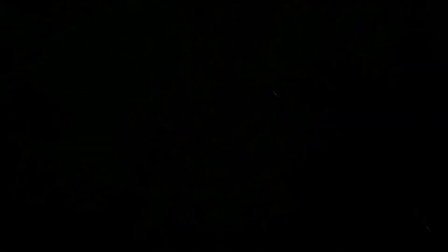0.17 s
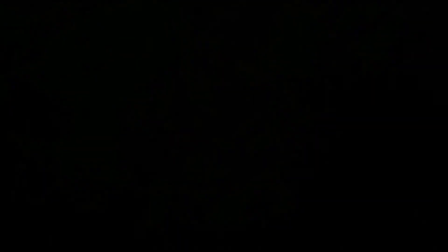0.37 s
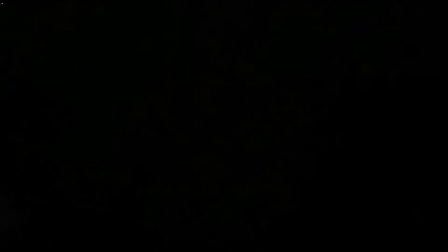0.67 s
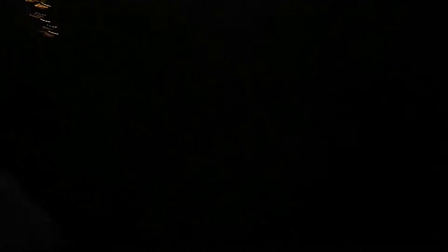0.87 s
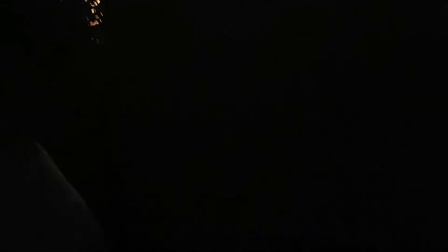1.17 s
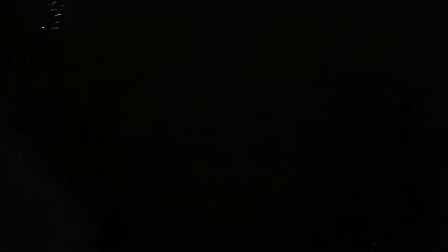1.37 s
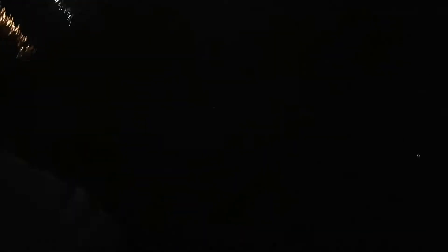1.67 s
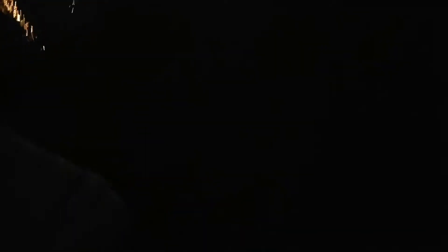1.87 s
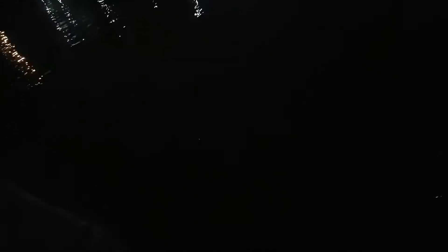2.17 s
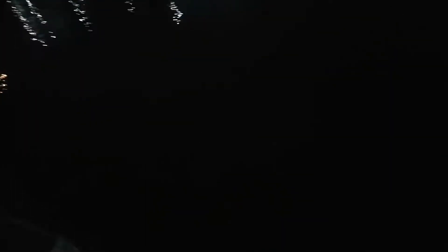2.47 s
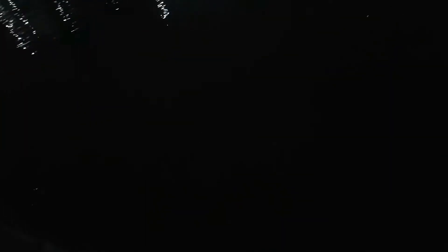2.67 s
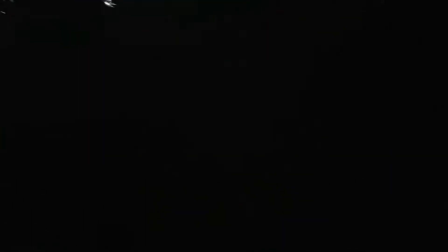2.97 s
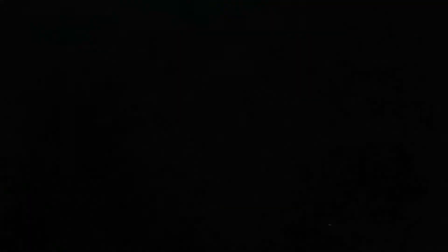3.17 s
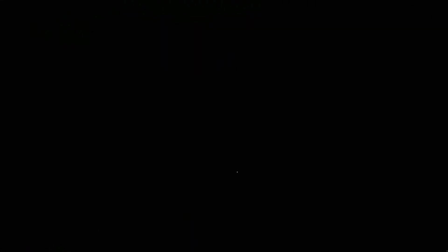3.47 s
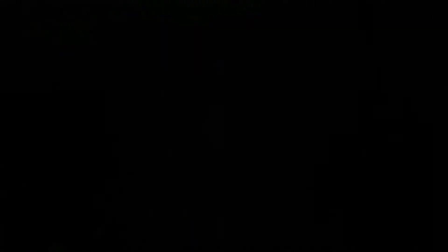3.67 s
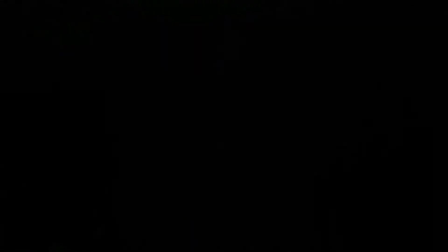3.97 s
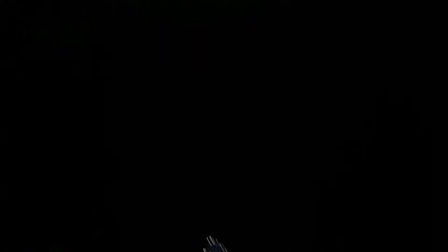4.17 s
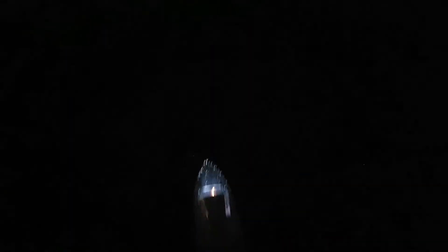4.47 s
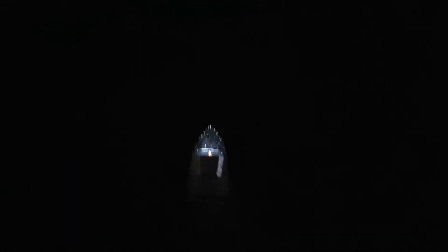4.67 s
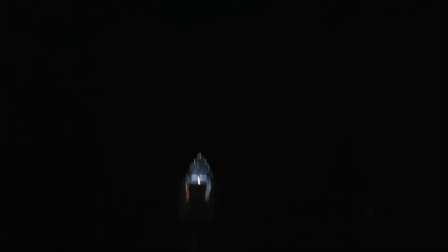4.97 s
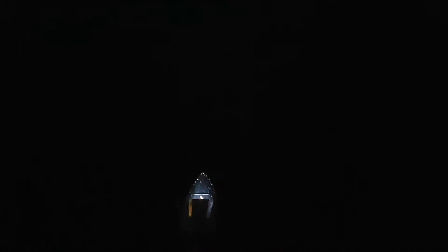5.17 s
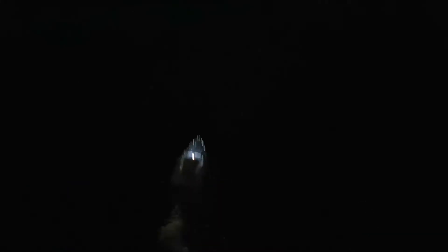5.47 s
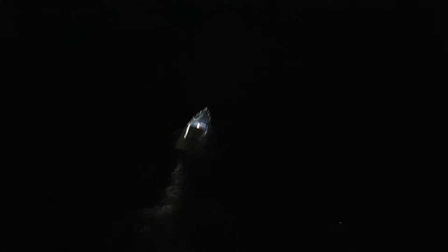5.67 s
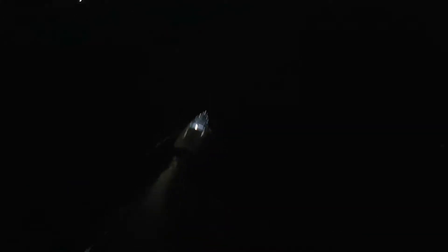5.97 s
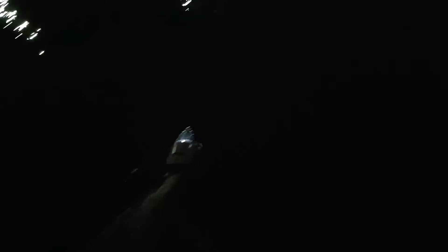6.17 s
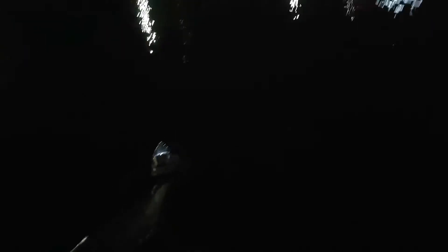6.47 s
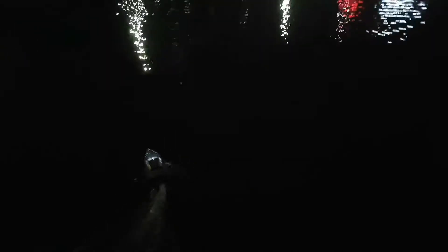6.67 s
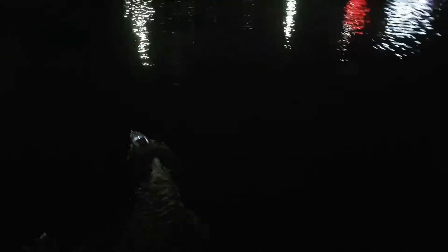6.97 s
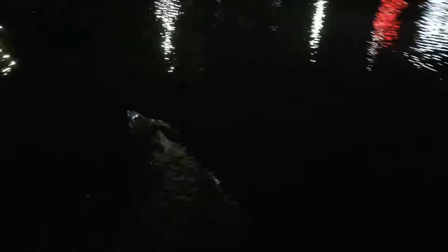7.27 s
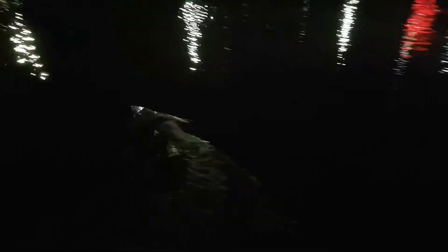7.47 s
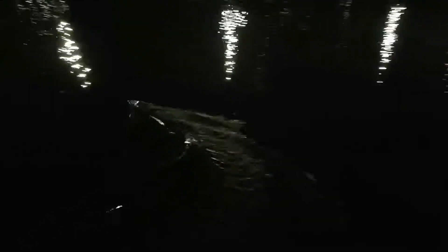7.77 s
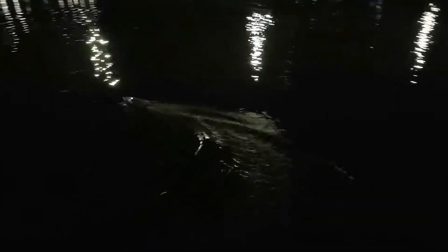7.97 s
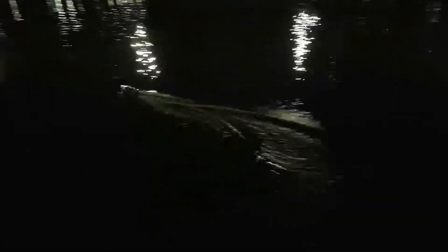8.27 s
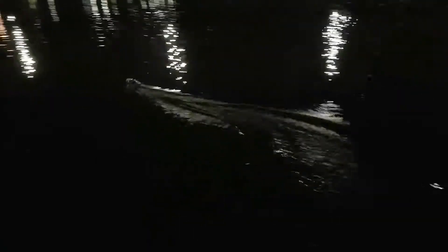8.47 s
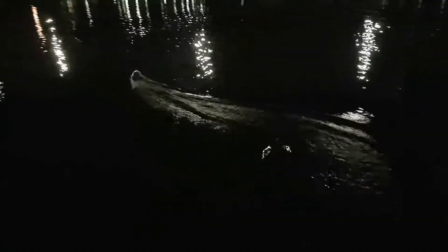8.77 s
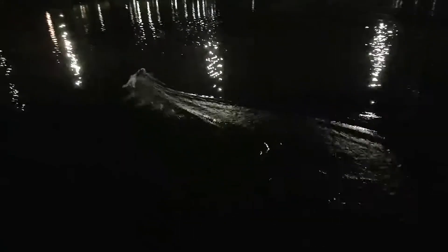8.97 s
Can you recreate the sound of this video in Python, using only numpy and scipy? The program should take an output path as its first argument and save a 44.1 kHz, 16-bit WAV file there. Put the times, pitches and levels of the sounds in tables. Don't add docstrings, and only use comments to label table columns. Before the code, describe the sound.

A handheld stereo microphone at a dark riverbank catches sleeve rustle, taps and clicks over a soft traffic wash. After a nearly quiet pause, a small electric boat starts very close: a quick upward swoop, a steady buzzing whine with rough undertones, a drop in pitch, then stepwise rises. Hissing propeller wash surrounds it; later the tone wavers, flutters and weakens with distance.

```python
import sys
import numpy as np
from scipy import signal
from scipy.fft import rfft, irfft, next_fast_len
from scipy.io import wavfile
from scipy.ndimage import uniform_filter1d, map_coordinates

SR = 44100
rng = np.random.default_rng(int(sys.argv[2]) if len(sys.argv) > 2 else 0)


def master_out(mix):
    frames = np.transpose(np.atleast_2d(mix))
    ceiling = np.clip(frames, -1, 1)
    pcm = np.round(ceiling * 32767).astype(np.int16)
    wavfile.write(sys.argv[1], SR, pcm)


def gain_from_db(level_db):
    decades = np.asarray(level_db, float) / 20
    return 10 ** decades


N = 401751

# time [s], level of all shaft orders with distance [dB], flutter depth [0-1].
COURSE = [(3.2, -35, 0.7), (3.27, -14, 0.16), (3.35, 3, 0.05), (3.8, -2.5, 0.11), (4.2, -3, 0.06),
          (4.7, -5.5, 0.07), (4.95, -5, 0.12), (5.4, -4, 0.05), (5.8, -0.5, 0.16), (6.2, -3, 0.09),
          (6.7, -7, 0.31), (7.2, -7, 0.21), (7.7, 0.5, 0.12), (8.2, -6, 0.18), (8.7, -8, 0.28),
          (9.11, -9, 0.18)]


def rms_one(x):
    return x / np.sqrt(np.mean(x ** 2) + 1e-20)


def in_time(rows):
    s, *columns = np.transpose(rows)
    return [np.interp(np.arange(N) / SR, s, c) for c in columns]


def at_hz(points, hz):
    table_hz, value = np.transpose(points)
    return np.interp(np.log(hz), np.log(table_hz), value)


def bump(s, half_width, order=2):
    out, t = np.zeros(N), np.arange(N) / SR
    first = max(int((s - 3 * half_width) * SR), 0)
    near = slice(first, int((s + 3 * half_width) * SR))
    out[near] = np.exp(-((t[near] - s) / half_width) ** order)
    return out


def drift(rate):
    thin = 20
    pole = np.exp(-2 * np.pi * rate * thin / SR)
    noise = rng.standard_normal(N // thin + 4002)
    slow = signal.lfilter([1], [1, -2 * pole, pole * pole], noise)[4000:]
    return np.interp(np.arange(N) / thin, np.arange(len(slow)), rms_one(slow))


def panned(db):
    return gain_from_db(np.array([db / 2, -db / 2]))


def bands(spectrum, patchy_db, speed):
    shared_flicker = .45
    edges = 20 * 2 ** np.arange(0, 9.6, .5)
    centres = np.sqrt(edges[:-1] * edges[1:])
    inside = (centres > spectrum[0][0]) * (centres < spectrum[-1][0])
    gains = gain_from_db(at_hz(spectrum, centres)) * inside
    gains = gains / np.sqrt(np.sum(gains ** 2 * np.diff(edges)) * 2 / SR)
    white, together = rng.standard_normal((2, 3, N)), drift(speed / 3)
    for k in np.flatnonzero(gains):
        sos = signal.butter(2, edges[k:k + 2], "band", fs=SR, output="sos")
        flicker_db = patchy_db * (shared_flicker * together + drift(speed))
        yield centres[k], gains[k] * gain_from_db(flicker_db), sos, white[k % 2]


def diffuse(spectrum, patchy_db, speed):
    # frequency [Hz], left-right likeness [share].
    likeness = [(60, 0.92), (180, 0.94), (550, 0.52), (1640, -1.7), (4950, -0.11), (14900, -0.31)]
    out = 0
    for hz, gain, sos, white in bands(spectrum, patchy_db, speed):
        mid, side = signal.sosfilt(sos, white[:2])
        alike = np.clip(at_hz(likeness, hz), 0, 1)
        middle = np.sqrt((1 + alike) / 2) * mid
        spread = np.sqrt((1 - alike) / 2) * side * [[1], [-1]]
        out = out + gain * (middle + spread)
    return out


def noise_band(hz, db, half_width_hz):
    lowpass = signal.butter(2, half_width_hz, fs=SR, output="sos")
    wide = signal.sosfilt(lowpass, rng.standard_normal((2, N)))
    return gain_from_db(db) * rms_one(wide * np.cos(2 * np.pi * np.cumsum(hz) / SR))


def passing_car():
    # time [s], low band [Hz], its level [dB], high band [Hz], its level [dB].
    car_bands = [
        (0, 901, -39.5, 1505, -64),
        (.5, 866, -45.5, 1432, -59),
        (1.0, 847, -47, 1491, -47.5),
        (1.35, 898, -51.5, 1580, -46.5),
        (1.8, 880, -67, 1640, -55),
    ]
    low_hz, low_db, high_hz, high_db = in_time(car_bands)
    low = noise_band(low_hz, low_db, half_width_hz=108)
    return low + noise_band(high_hz, high_db, half_width_hz=260)


def night():
    # time [s], wind rumble [dB], traffic, later with the boat's low noise [dB].
    night_levels = [(0, -41, -41.5), (.63, -41.5, -44), (1.62, -48, -43), (1.75, -58.5, -42),
                    (3.2, -57, -43), (3.98, -53, -53), (4.2, -56, -39.5), (4.85, -44, -40),
                    (5.63, -43.5, -33.5), (6.04, -46, -36), (6.6, -44, -37), (9.11, -46.5, -41)]
    # frequency [Hz], density [dB per Hz].
    rumble_colour = [(12, -39), (20, -13), (59, 1), (103, 0), (167, -11), (200, -2), (260, -44),
                     (440, -120)]
    # frequency [Hz], density [dB per Hz].
    traffic_colour = [(59, -31), (100, -12), (179, -5), (439, 0.5), (625, -1.5), (1530, -4.5),
                      (3380, -27.5), (8090, -38.5), (9760, -37), (12300, -42.5), (14500, -44)]
    rumble_db, traffic_db = in_time(night_levels)
    wind = gain_from_db(rumble_db) * diffuse(rumble_colour, 0.54, 7.8)
    traffic = gain_from_db(traffic_db) * diffuse(traffic_colour, 1.0, 5.5)
    return wind + traffic + passing_car()


def rustle():
    # time [s], half width [s], level [dB], left-right [dB].
    rub_moves = [(0.11, 0.033, -47.5, 6), (0.27, 0.14, -55.5, -1), (0.42, .05, -64, 3),
                 (0.61, 0.082, -64, 3), (.77, .03, -60, 5), (.89, 0.069, -58, -3.5), (1.03, .04, -56.5, -5),
                 (1.13, 0.047, -57, -6), (1.22, 0.033, -62, 5), (1.335, 0.013, -44.5, 5),
                 (1.42, 0.067, -57.5, -3), (1.68, 0.06, -56.5, -7), (2.629, .04, -63, -2),
                 (2.96, 0.11, -59.5, -10)]
    # frequency [Hz], density [dB per Hz].
    cloth_colour = [(1180, -33), (2000, 6), (2950, -3), (3660, -10), (4940, -5), (5590, -12), (8250, -10.5),
                    (14500, -21)]
    # time [s], half width [s], centre [Hz],
    # level [dB].
    scuffs = [
        (.3, 0.37, 2750, -57),
        (1.12, .1, 2770, -56),
        (1.15, .04, 5000, -62),
        (1.69, .05, 4970, -65),
        (2.635, 0.018, 3800, -60),
        (2.96, .07, 4820, -58),
        (4.15, 0.046, 3500, -37),
    ]
    rest_db = -64
    rubs = sum(gain_from_db(db) * panned(pan_db)[:, None] * bump(s, width) for s, width, db, pan_db in rub_moves)
    ending = np.clip((3.2 - np.arange(N) / SR) / 0.043, 0, 1)
    cloth = ending * (gain_from_db(rest_db) + rubs) * diffuse(cloth_colour, 3.1, 70.0)
    scuff = sum(bump(s, width, order=4) * noise_band(np.full(N, hz), db, half_width_hz=340)
                for s, width, hz, db in scuffs)
    return cloth + scuff


def knocks(rows, t60, puff_share):
    out, t = np.zeros((2, N)), np.arange(4000) / SR
    decay = gain_from_db(-60 * t / t60)
    for s, db, hz, pan_db in rows:
        dull = signal.butter(1, min(0.78 * hz, .45 * SR), fs=SR)
        puff = puff_share * signal.lfilter(*dull, rng.standard_normal(len(t))) * decay
        attack = 1 - np.exp(-t * hz * 1.9)
        ring = np.sin(2 * np.pi * hz * t) * decay * attack
        at = round(s * SR)
        out[:, at:at + len(t)] += gain_from_db(db) * panned(pan_db)[:, None] * (ring + puff)
    return out


def contacts():
    # time [s], peak [dB], pitch [Hz], left-right [dB].
    taps = [(0.1, -34, 1420, -4), (0.166, -31, 1550, -4), (0.257, -40, 2580, -3.5),
            (1.826, -37.5, 2200, -13), (0.058, -37, 1110, -2), (0.1015, -52, 4800, 3),
            (0.167, -38, 2920, 6), (0.194, -52, 4500, 0.5), (0.254, -53, 4600, -3)]
    clicks = [
        (0.0565, -11, 1100, 2),
        (0.8557, -12, 1000, -1.0),
        (1.116, -21, 1300, -5),
        (1.0545, -25, 900, -1),
        (1.3225, -20, 700, 1.5),
    ]
    ticks = [(0.5067, -45, 8320, -10), (0.7682, -53, 8270, -8), (1.0131, -51, 8340, -11),
             (1.0234, -46, 8370, -9), (1.058, -47, 8150, -6), (1.1154, -50, 7400, -6.5),
             (1.2082, -53, 8270, -5), (1.3324, -41, 8120, 0.5), (1.51, -52, 8350, -9),
             (1.552, -55, 8200, -4.0), (1.9949, -52, 13000, -4.0)]
    thumps = [
        (1.054, -16, 322, -1.0),
        (1.112, -25, 350, -4),
        (1.318, -21, 432, -7),
    ]
    out = knocks(taps, t60=0.028, puff_share=0.98) + knocks(clicks, t60=0.0027, puff_share=0.18)
    out += knocks(ticks, t60=0.013, puff_share=1.0)
    return out + knocks(thumps, t60=0.016, puff_share=0.46)


def shaft_speed():
    # time [s], ramp [s], shaft rate reached [turns per s].
    throttle = [(3.2, 0.085, 180), (3.285, 0.05, 278), (3.335, 0.065, 284), (3.405, 0.04, 235),
                (3.493, 0.025, 270), (3.518, 0.04, 289.5), (4.13, 0.07, 231), (4.25, 0.06, 239.2),
                (4.525, 0.035, 265), (4.705, 0.04, 288), (4.745, 0.13, 293.5), (4.875, 0.035, 310),
                (5.1, 0.155, 322), (5.255, 0.032, 362), (5.287, 0.04, 365.8), (5.5, 0.04, 376.6),
                (6.45, 0.055, 422), (7.14, 0.06, 452), (7.2, 0.1, 495), (7.3, 0.07, 512.2)]
    crank_turns_per_s = 110
    s, ramp, turns = np.transpose(throttle)
    t = np.arange(N) / SR
    steps = np.diff(turns, prepend=crank_turns_per_s)
    return crank_turns_per_s + sum(step * np.clip((t - a) / b, 0, 1) for a, b, step in zip(s, ramp, steps))


def low_order(order, hz):
    # frequency [Hz], level [dB].
    hull_low = [(230, -24.5), (290, -13.5), (420, -21.0), (510, -14), (600, -21.5), (760, -20.5),
                (1050, -29.5), (2000, -35)]
    # time [s], half width [s], order,
    # swell or fade [dB].
    rolls = [(3.38, 0.062, 1, -5), (3.4, 0.13, 3, -13.5), (3.62, 0.26, 2, -12), (3.97, 0.039, 3, 6),
             (3.97, 0.18, 2, -11), (4.08, 0.097, 4, 10), (4.14, 0.13, 1, -3), (4.22, 0.036, 4, -15.5),
             (4.3, 0.17, 2, -16.5), (4.39, 0.38, 3, -2), (4.73, 0.44, 2, -4), (4.94, 0.073, 3, 9),
             (4.95, 0.21, 4, 4), (5.31, 0.12, 3, 12.5), (5.38, 0.065, 1, 8), (5.73, 0.26, 1, -8),
             (5.91, 0.076, 3, -20), (6.089, 0.067, 2, 4), (6.2, 0.16, 3, 7), (6.33, 0.057, 2, -6.5),
             (6.401, 0.8, 4, 4), (6.61, 0.21, 2, 5), (7.09, 0.1, 4, 9.5), (7.299, 0.15, 2, 4.5),
             (7.42, 0.14, 3, 15.5), (7.921, 0.12, 3, 13), (8.1, 0.12, 1, -4.5), (8.39, 0.17, 2, 6),
             (8.24, 0.024, 1, 3), (8.57, 0.27, 3, 11.5), (3.315, 0.0084, 1, 10), (3.55, 0.05, 1, -3),
             (3.27, 0.008, 2, 7.5), (4.11, 0.052, 2, 11), (5.16, 0.051, 2, -4.5), (5.34, 0.043, 2, 5.5),
             (7.0, 0.046, 2, 7), (8.2, 0.059, 2, 5.5), (3.55, 0.016, 3, -3), (4.07, 0.058, 3, 6.5),
             (4.26, 0.024, 3, -10), (3.31, 0.015, 4, 6.5), (5.276, 0.036, 3, -5.5), (7.6, 0.03, 3, 5.5),
             (7.72, 0.038, 3, -11), (3.293, 0.0061, 2, 5.5), (9.03, 0.054, 3, -6), (3.8, 0.029, 4, 6),
             (5.46, 0.032, 4, -22), (8.65, 0.081, 4, -9),
             (3.425, 0.009, 2, -5), (3.65, 0.015, 4, -19), (6.18, 0.014, 2, -13), (7.38, 0.014, 4, -11),
            (7.5, 0.021, 2, -14), (7.515, 0.0079, 3, -7), (7.54, 0.016, 4, -17), (7.64, 0.013, 2, -26),
            (7.67, 0.013, 3, -10), (7.79, 0.0096, 3, -12), (7.82, 0.021, 2, -24), (8.045, 0.023, 1, -6),
            (8.161, 0.024, 1, -9), (8.36, 0.0094, 3, -13), (8.389, 0.015, 1, -3), (3.326, 0.012, 2, -4),
            (6.035, .025, 1, -13), (6.33, 0.13, 1, 3), (6.064, 0.011, 2, 8.5), (6.352, 0.0076, 2, -13),
            (8.075, 0.014, 1, -7), (8.55, 0.023, 1, 5), (7.815, 0.019, 3, 5.5), (8.93, 0.008, 3, 11),
            (8.79, 0.034, 3, 0.5), (7.05, .02, 2, -12)]
    # centre [Hz], half width [Hz], gain [dB].
    spin_up_mode = (404, 69, 21.5)
    cut_db = 32 * np.minimum(np.log2(hz / hull_low[0][0]), 0)
    mode_hz, width_hz, mode_db = spin_up_mode
    mode = mode_db * np.exp(-((hz - mode_hz) / width_hz) ** 2)
    dull_db = -13 * (order > 2)
    spin_db = (mode + dull_db) * bump(3.27, 0.027, order=4)
    waves_db = sum(db * bump(s, width) for s, width, k, db in rolls if round(k) == order)
    return at_hz(hull_low, hz) + cut_db + spin_db + waves_db


def singing(order):
    # time [s], half width [s], order, extra level or cut [dB].
    panel_sings = [(3.2, 0.2, 11, -11), (3.2, 0.41, 12, -5), (3.7, 0.2, 16, 7), (3.42, 0.15, 13, -3),
                   (3.43, 0.16, 6, -7), (3.481, 0.028, 7, -15), (3.65, 0.16, 11, 9), (3.7, 0.13, 8, -16),
                   (3.86, 0.56, 9, 7.5), (4.02, 0.053, 7, 5), (4.38, 0.11, 14, 1), (4.28, 0.085, 9, -12),
                   (4.46, 0.15, 8, -10), (4.51, 0.064, 10, -13), (4.63, 0.11, 13, 18), (5.05, 0.17, 11, -6),
                   (5.22, 0.27, 7, -5), (5.64, 0.79, 10, -18), (5.91, 0.29, 5, -10), (5.95, 0.49, 6, -6.5),
                   (3.8, 0.3, 14, 8), (6.389, 0.6, 9, 10.5), (6.64, 0.29, 10, 8.5), (7.74, 0.13, 7, 7),
                   (8.21, 0.36, 6, 14.5), (8.7, 0.75, 6, -11.5), (4.23, 0.053, 5, 12.5),
                   (4.352, 0.058, 5, -4), (4.86, 0.028, 5, 3), (5.31, 0.04, 5, 7), (6.952, 0.093, 5, -17),
                   (3.72, 0.03, 6, -9), (3.999, 0.11, 6, 6.5), (4.43, 0.064, 6, -20), (5.07, 0.058, 6, -11),
                   (6.75, 0.12, 6, 6.5), (7.25, 0.08, 6, 9.5), (3.69, 0.14, 7, -10), (4.559, 0.032, 7, 9),
                   (4.82, 0.12, 7, 3), (4.98, 0.097, 7, -8), (6.75, 0.11, 8, 14.5), (3.96, 0.052, 9, 9.5),
                   (4.38, .1, 9, -13), (4.8, .04, 9, 8), (5.35, 0.09, 9, 0), (4.8, .1, 10, 4),
                   (3.535, 0.033, 11, 8), (3.7, .17, 12, 6), (3.72, .17, 13, 1),
                   (3.47, 0.033, 9, -8), (3.47, .04, 11, -11), (6.2, .1, 11, -4), (4.27, 0.043, 10, 6),
                  (4.62, 0.098, 12, 6), (5.27, .02, 6, 9), (5.85, 0.37, 6, 4), (6.09, 0.36, 9, 7),
                  (6.1, 0.14, 7, 4.5), (5.9, 0.46, 11, 6), (6.7, 0.21, 5, 0.5), (7.95, 0.11, 6, -4),
                  (5.72, 0.19, 9, 6), (4.63, .08, 18, 9), (5.7, 0.11, 18, 11), (4.38, 0.12, 12, 1)]
    return sum(db * bump(s, width, order=4) for s, width, k, db in panel_sings if round(k) == order)


def shaft_orders(turn, speed_hz, lag):
    # frequency [Hz], level [dB].
    hull_high = [(1100, -38.5), (1350, -34), (1560, -26), (1780, -35.5), (2030, -29.5), (2200, -37),
                 (2370, -32.5), (2600, -44.5), (2900, -43.5), (3200, -42), (3420, -57.5), (3800, -49),
                 (4600, -52), (5200, -71), (7000, -79)]
    # time [s], left-right of the 1st order [dB].
    heading = [(3.3, -0.5), (3.9, -0.5), (4.5, 0.5), (5.1, 0.5), (6.3, -3.5), (6.6, -6.5), (6.9, -9),
               (7.2, 5.5), (7.5, 7.5), (7.8, 4.5), (8.1, 5.5), (8.4, 3.5), (9.0, 1)]
    # time [s], half width [s], left-right [dB].
    swings = [
        (3.8, 0.45, 16),
        (5.1, 0.2, 6.5),
    ]
    # time [s], depth on low orders [0-1], depth on upper orders [0-1].
    grind_depth = [
        (3.2, .45, .5),
        (3.33, .3, .45),
        (3.38, .16, .35),
        (3.53, .26, .5),
        (3.6, .02, .02),
        (5.8, .03, .03),
        (6.05, .22, .04),
        (7.1, .26, .08),
        (7.4, .1, .6),
        (9.11, .16, .6),
    ]
    beams_db = in_time(heading)[0], sum(db * bump(s, width) for s, width, db in swings)
    high_db, flutter = in_time(COURSE)
    speed_jump = uniform_filter1d(abs(np.gradient(speed_hz)), size=600) * SR
    shudder = 0.28 * np.tanh(speed_jump / 800)
    upward = np.exp(2j * np.pi * 18.0 * np.arange(N) / SR)
    out, grind = np.zeros((2, N)), in_time(grind_depth)
    grain = drift(38) + 1j * drift(38)
    for k in range(1, 22):
        depth = np.clip(flutter + shudder * (k > 2), 0, 1) * min(k, 3) ** .35
        tremble = depth * (drift(25.0) + 1j * drift(11.8)) * upward
        grit = (k > 1) * (grind[k > 4] + shudder) * np.roll(grain, k * SR // 5)
        phase = k * turn + rng.uniform(0, 2 * np.pi)
        line = np.sqrt(2) * (1 + tremble + grit) * np.exp(1j * phase)
        late = np.exp(1j * np.pi * k * speed_hz * lag / SR)
        if k <= 4:
            bob_db = 3.0 * flutter * drift(5.9)
            level_db = low_order(k, k * speed_hz) + high_db + bob_db
        else:
            jump_loss_db = 3.5 * k * shudder
            fade_db = .7 * drift(15.0)
            level_db = at_hz(hull_high, k * speed_hz) + high_db - jump_loss_db + singing(k) + fade_db
        beam_db = beams_db[k - 1] if k <= 2 else 3.0 * drift(2.5)
        out += gain_from_db(level_db) * panned(beam_db) * np.array([(line / late).real, (line * late).real])
    return out


def slipping_bearing(turn):
    # time [s], level [dB].
    slip_level = [
        (3.33, -40),
        (3.36, -3),
        (3.42, -5),
        (3.45, -39),
        (3.5, -44),
        (3.54, 1.5),
        (4.12, -5),
        (4.17, -47),
    ]
    # multiple of shaft rate, level [dB].
    slip_lines = [(.3515, -41), (1.352, -48), (1.6485, -33), (2.68, -44)]
    lines = sum(gain_from_db(db) * np.sin(share * turn) for share, db in slip_lines)
    return gain_from_db(in_time(slip_level)[0]) * lines


def arrive(mono, lag):
    return np.array([map_coordinates(mono, [np.arange(N) - side * lag / 2], order=3) for side in (1, -1)])


def wash(turn, speed_hz, lag):
    # time [s], level [dB].
    splash_level = [(3.17, -74), (3.22, -55.5), (3.37, -45.5), (3.5, -47), (3.55, -44), (3.96, -44),
                    (4.3, -48), (4.6, -49), (4.74, -43.5), (5.25, -44), (5.37, -40), (5.96, -42.5),
                    (6.46, -44.5), (6.89, -44.5), (7.39, -43), (8.08, -46), (8.5, -49), (9.11, -54.5)]
    # time [s], level [dB].
    froth_level = [(3.2, 0), (3.6, -2), (4.1, 3), (4.4, 4), (5.0, -0.5), (5.4, 1), (5.9, 0.5), (6.4, -3),
                   (7.2, -2), (8.0, 0), (9.11, -2)]
    # frequency [Hz], density [dB per Hz].
    wash_colour = [(88, -54), (150, -12), (406, -6.5), (473, -13), (654, 4.5), (1230, -2.5), (1550, -0.5),
                   (2300, -4), (3020, -13), (4870, -20), (9340, -21.5), (12900, -31.5), (14500, -28)]
    # frequency [Hz], share arriving straight.
    direct_share = [(200, .96), (1000, .92), (2000, .8), (4000, .72), (8000, .58), (14000, .54)]
    # time [s], half width [s], churn [dB], spray [dB].
    slaps = [(3.24, 0.038, -1.5, -13), (3.5, 0.037, -26, -5), (4.4, 0.36, -3, 1), (4.66, 0.065, 1.5, -6),
             (5.2, 0.26, 0, 5.5), (5.68, 0.18, 0.5, 6.5), (6.06, .03, 1.5, 2), (6.46, 0.15, 0, 5),
             (7.39, 0.73, 3, 3.5), (8.31, 0.27, -1.5, -4), (8.469, 0.076, 4, 7.5), (3.8, 0.23, 1, 0.5),
             (4.16, 0.04, 1, 6), (4.95, 0.2, 0, 3), (6.85, 0.25, 0, -1), (7.7, 0.39, 1, -2),
             (8.9, .15, 0.5, -4)]
    splash_db, froth_db = in_time(splash_level)[0], in_time(froth_level)[0]
    churn_slap_db, spray_slap_db = sum(np.outer(db, bump(s, width)) for s, width, *db in slaps)
    swell_db = splash_db + 44
    churn_db = -19 + 0.16 * swell_db + churn_slap_db
    faster_db = 7.5 * np.log2(speed_hz / 290)
    spray_db = -43 + 0.87 * swell_db + faster_db + spray_slap_db
    straight, scattered = 0, 0
    beat = 1 + .12 * np.cos(turn)
    drop_db = 2.0 * np.minimum(rng.exponential(1, N // 30 + 1), 4)
    drops = rms_one(gain_from_db(drop_db).repeat(30)[:N])
    for hz, gain, sos, white in bands(wash_colour, patchy_db=1.5, speed=10.6):
        if hz < 3000:
            level_db = churn_db - 12.5 + (hz > 1300) * froth_db
        else:
            level_db = splash_db + 21.0 if hz < 9000 else spray_db + 20.0
            white = white * drops
        under_db = -40 * np.clip(np.log2(0.87 * speed_hz / hz), 0, .6)
        noise = gain * gain_from_db(level_db + under_db) * signal.sosfilt(sos, white)
        share = np.clip(at_hz(direct_share, hz), 0, 1)
        straight = straight + np.sqrt(share) * noise[0]
        scattered = scattered + np.sqrt(1 - share) * noise[1:]
    return beat * (arrive(straight, lag) + scattered)


def boat():
    # time [s], left lag [samples].
    bearing_lag = [(3.45, 8), (3.55, 5.4), (3.95, 5.4), (4.25, 1), (4.75, -1), (5.5, -2.3), (6.7, -4),
                   (9.11, -4.4)]
    # time [s], speed gain [share].
    hops = [
        (8.2, 0.015),
        (8.462, 0.016),
        (8.562, 0.026),
        (8.71, 0.022),
        (8.866, 0.0203),
    ]
    # time [s], speed gain [share].
    swells = [
        (7.5, -.004),
        (7.68, .006),
        (8.1, -.008),
        (8.3, -.005),
        (8.42, -.007),
        (8.62, .002),
        (8.79, -.008),
        (9.05, -.008),
    ]
    t, speed_hz = np.arange(N) / SR, shaft_speed()
    lag, flutter = in_time(bearing_lag)[0], in_time(COURSE)[1]
    racing = sum(share * np.exp(-((t - s) / 0.01886) ** 2) for s, share in hops)
    racing += sum(share * bump(s, .05) for s, share in swells)
    waver = 0.01996 * flutter ** 1.267 * drift(21.46)
    turn = 2 * np.pi * np.cumsum(speed_hz * (1 + racing + waver)) / SR
    running = np.clip((t - 3.18) / 0.074, 0, 1)
    motor = shaft_orders(turn, speed_hz, lag) + slipping_bearing(turn)
    return running * (motor + wash(turn, speed_hz, lag))


def hull_buzz():
    # time [s], half width [s], centre [Hz], level [dB].
    buzzes = [
        (3.243, 0.017, 400, -28),
        (5.098, 0.31, 1080, -40),
    ]
    return sum(bump(s, width) * noise_band(np.full(N, hz), db, half_width_hz=19)[0] for s, width, hz, db in buzzes)


def scene():
    return night() + rustle() + contacts() + boat() + hull_buzz()


def band_limit(x):
    return signal.sosfilt(signal.butter(12, 15520, fs=SR, output="sos"), x)


def record(dry):
    # frequency [Hz], left-right [dB].
    port_balance = [(700, 0), (1500, 0), (4000, -3), (8000, -1.3), (12000, 3)]
    # centre [Hz], half width [Hz], depth [dB].
    treble_dip = (9690, 1010, -6.5)
    cutoff_hz = 14590
    size = next_fast_len(N)
    hz = np.arange(size // 2 + 1) * SR / size + 1
    dip_hz, width_hz, depth_db = treble_dip
    dip = gain_from_db(depth_db * np.exp(-((hz - dip_hz) / width_hz) ** 4))
    colour = panned(at_hz(port_balance, hz)) * dip * (hz < cutoff_hz)
    mix = irfft(rfft(dry, size) * colour, size)[:, :N]
    return band_limit(mix)


dry = scene()
out = record(dry)
master_out(out)
```